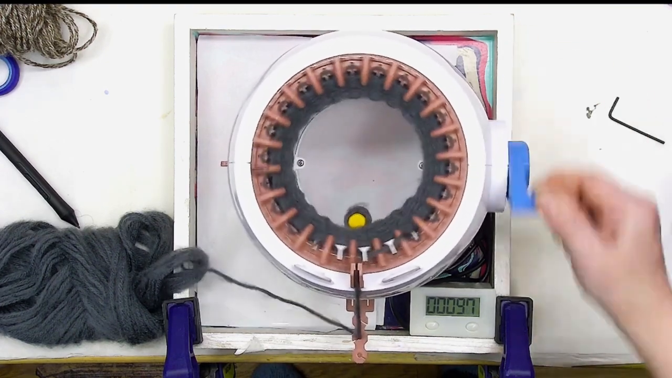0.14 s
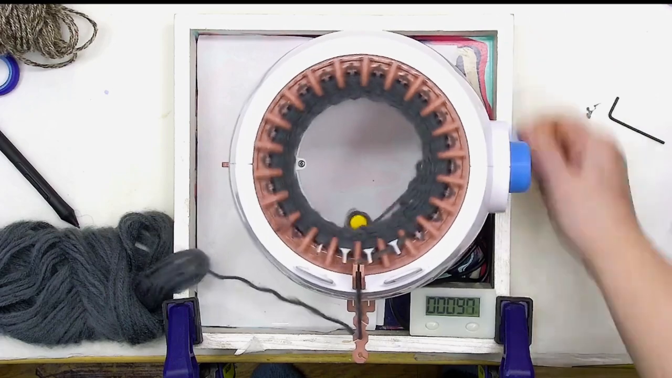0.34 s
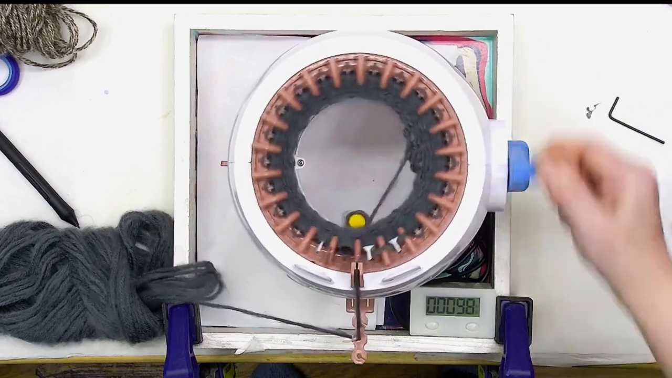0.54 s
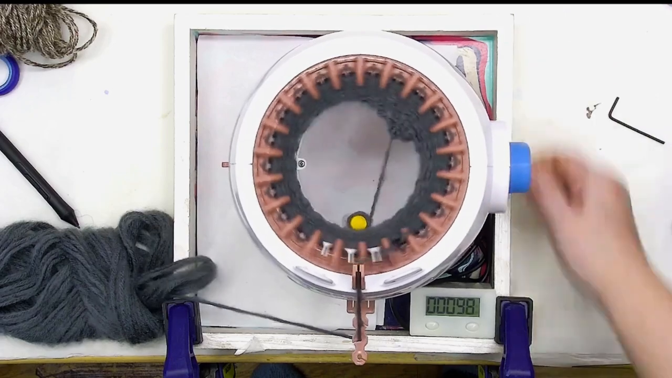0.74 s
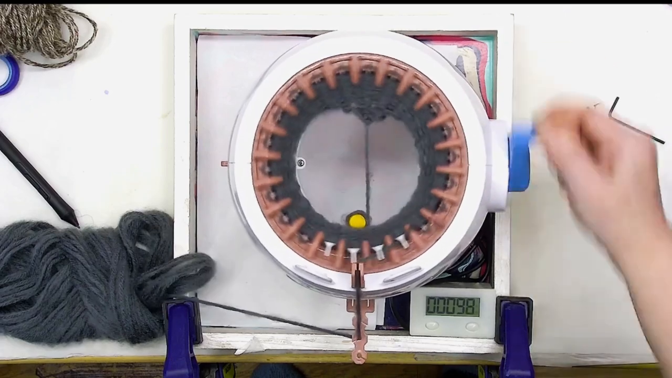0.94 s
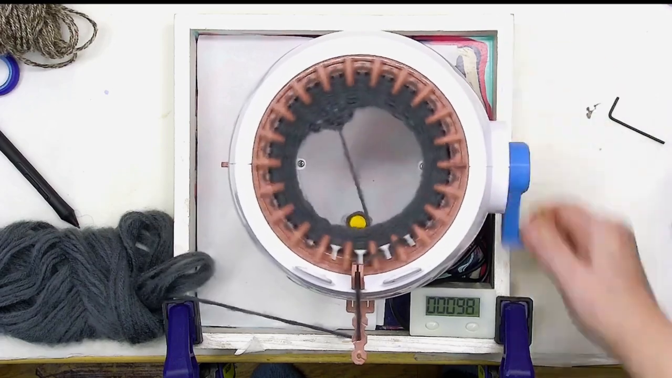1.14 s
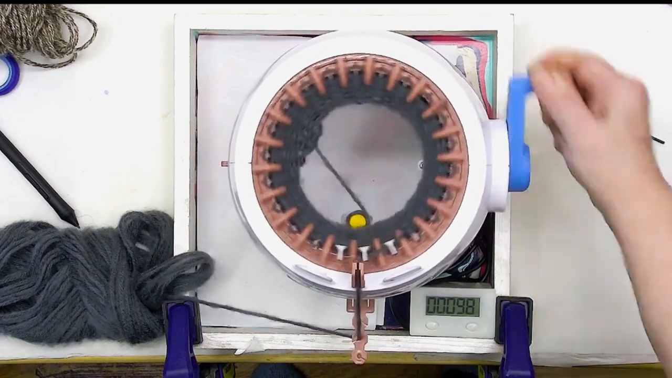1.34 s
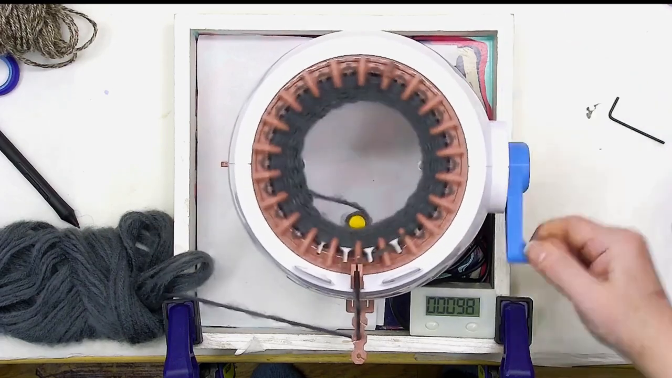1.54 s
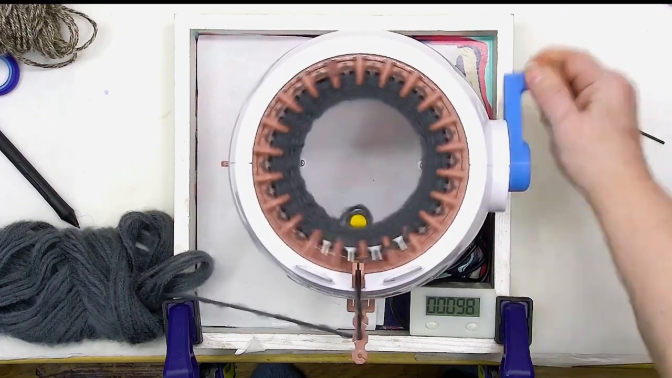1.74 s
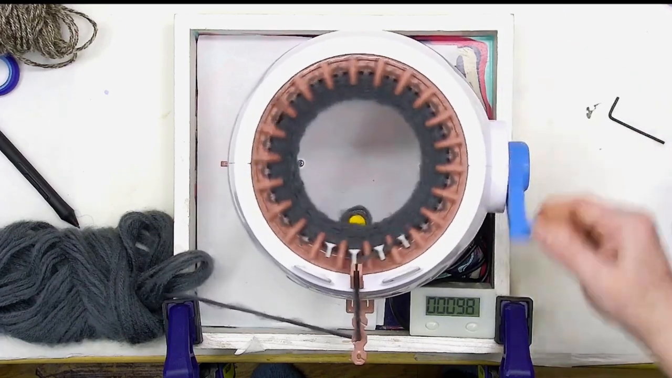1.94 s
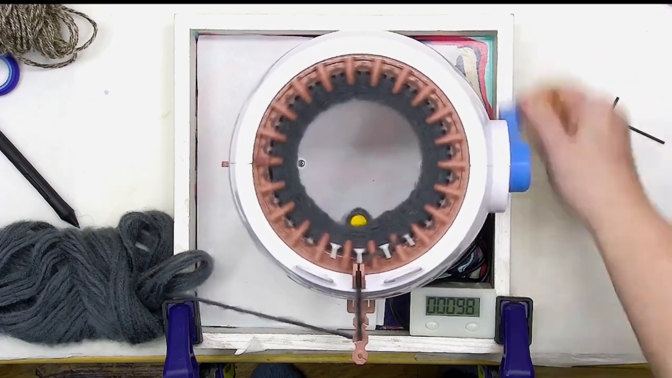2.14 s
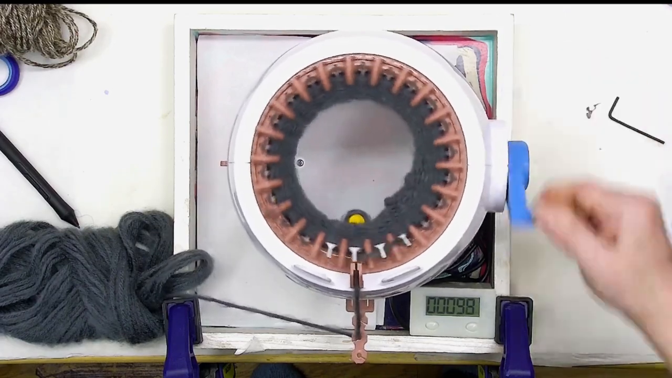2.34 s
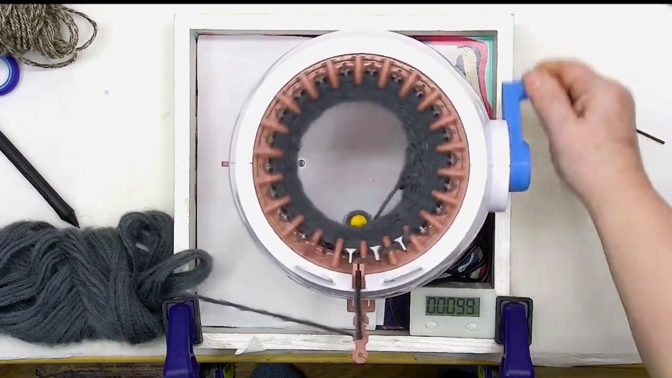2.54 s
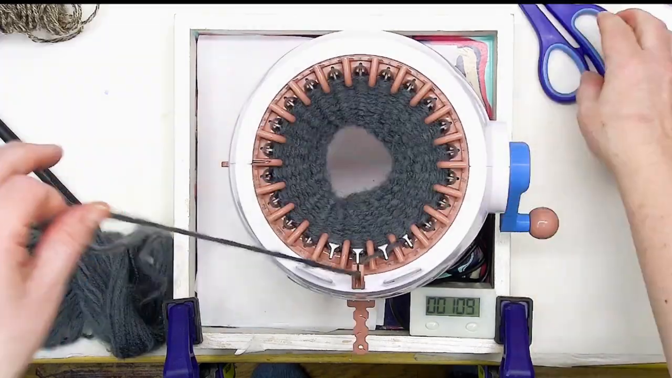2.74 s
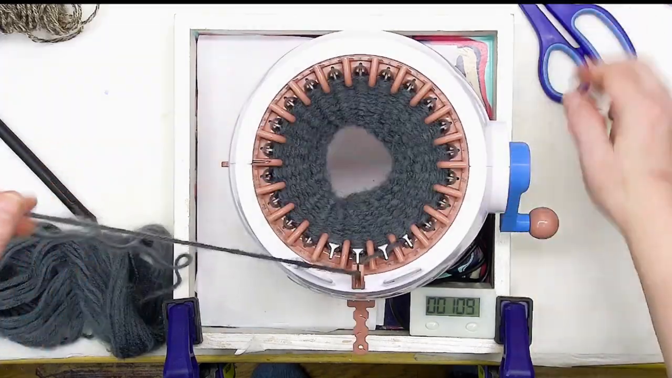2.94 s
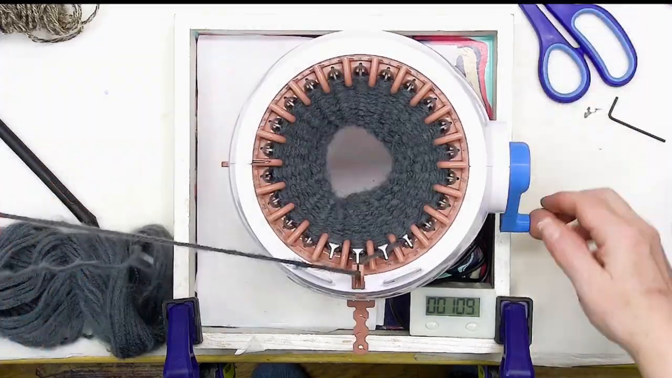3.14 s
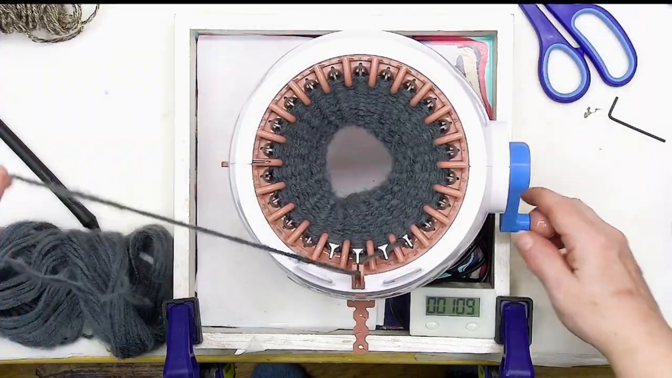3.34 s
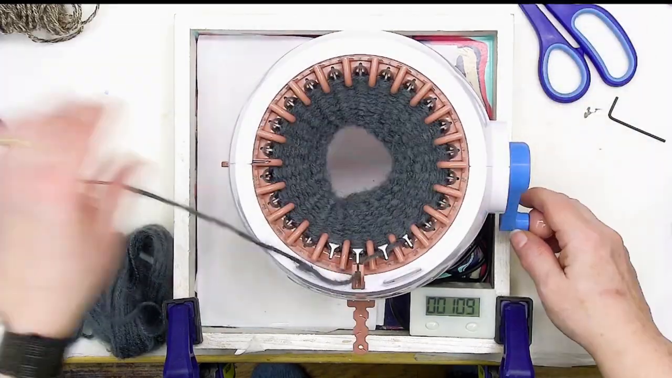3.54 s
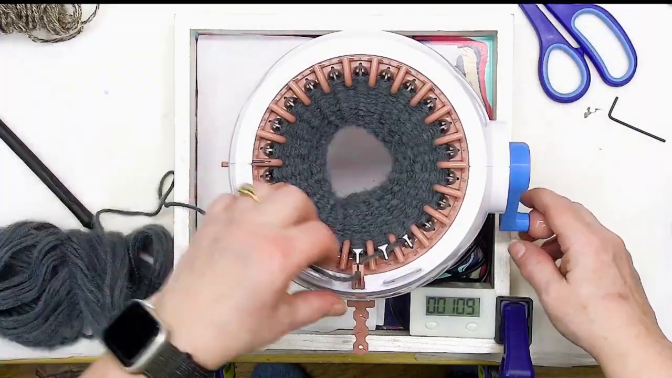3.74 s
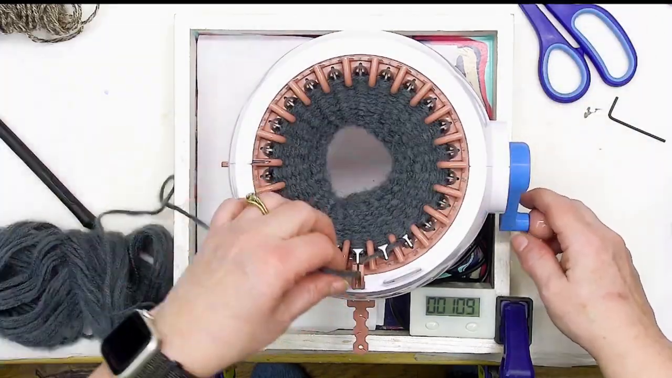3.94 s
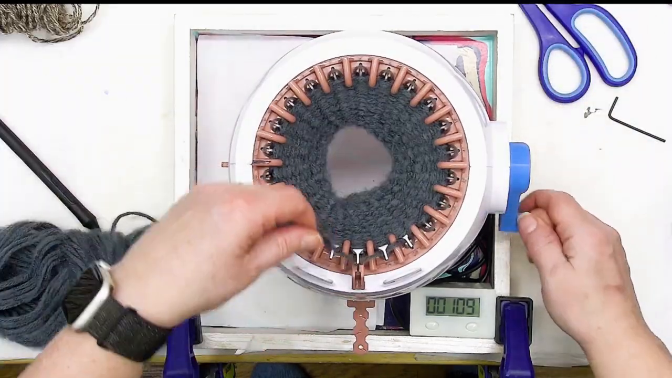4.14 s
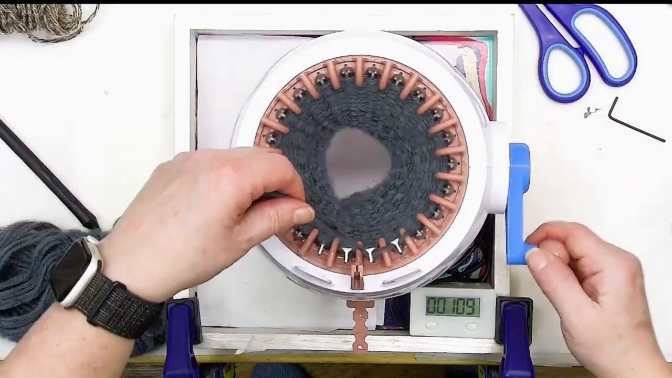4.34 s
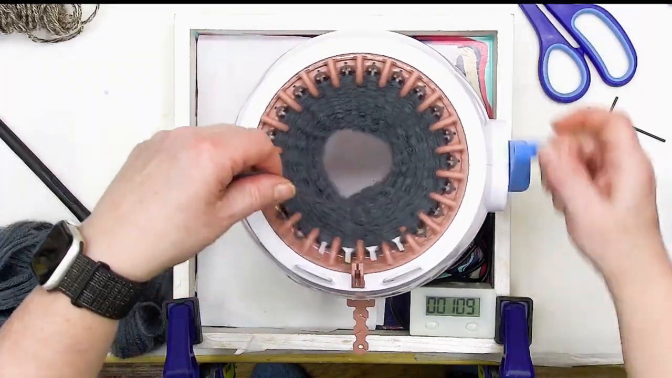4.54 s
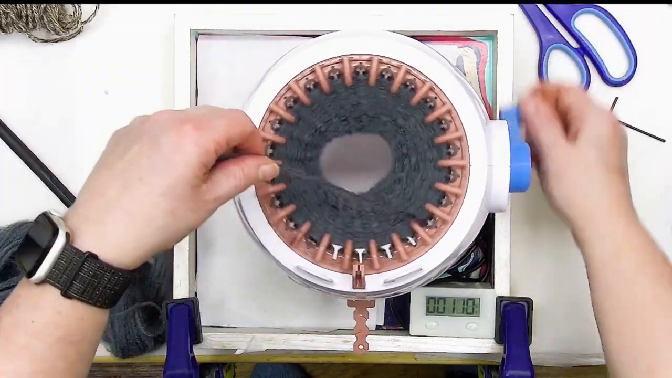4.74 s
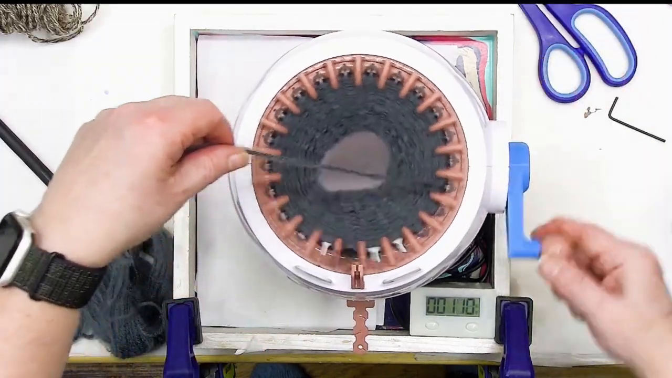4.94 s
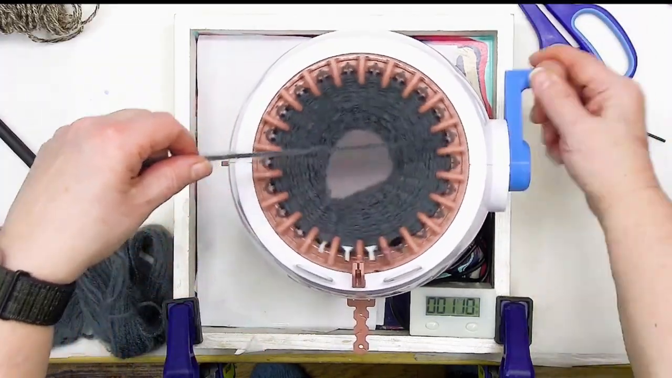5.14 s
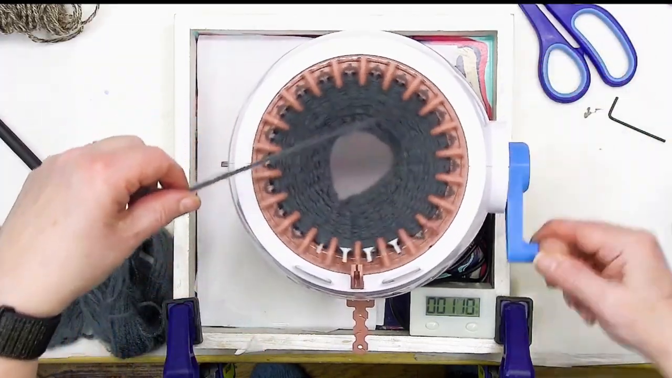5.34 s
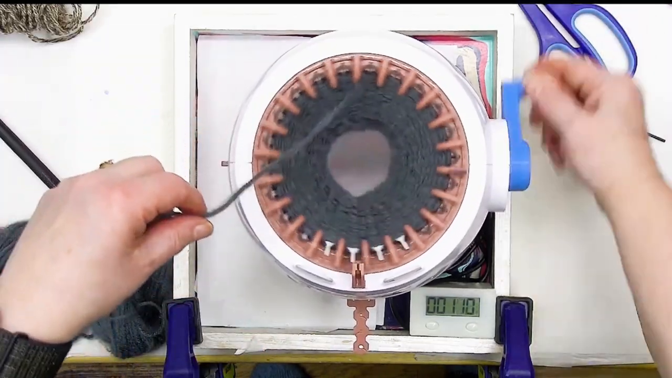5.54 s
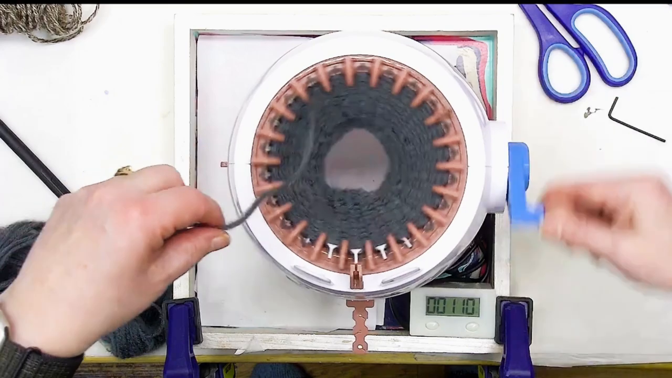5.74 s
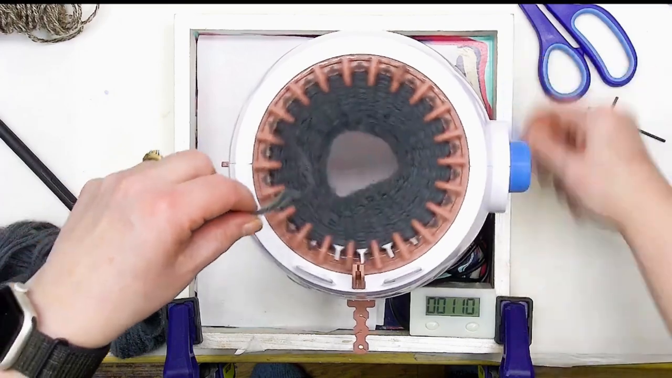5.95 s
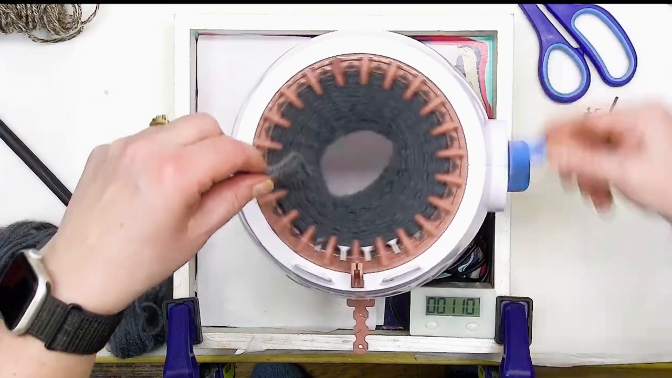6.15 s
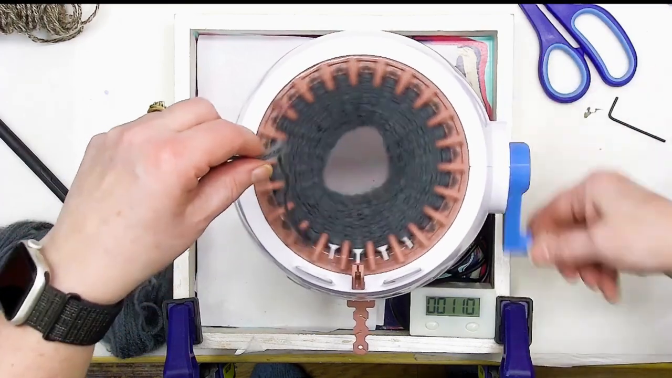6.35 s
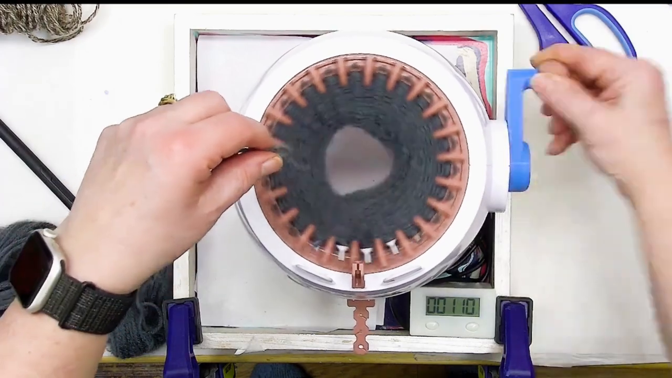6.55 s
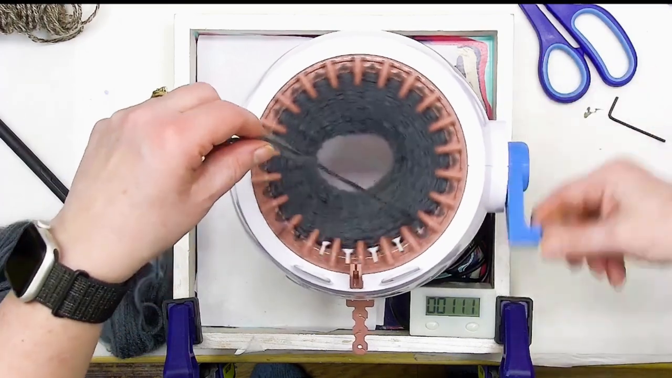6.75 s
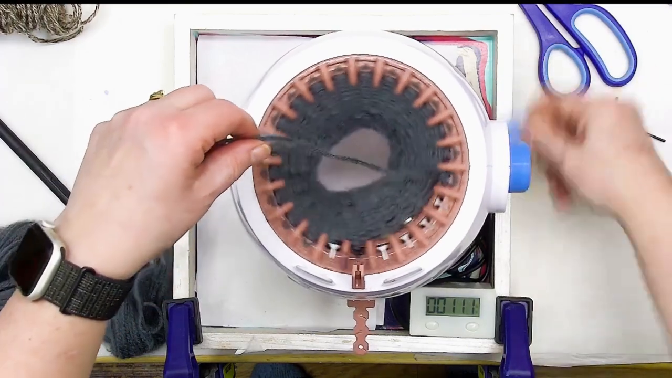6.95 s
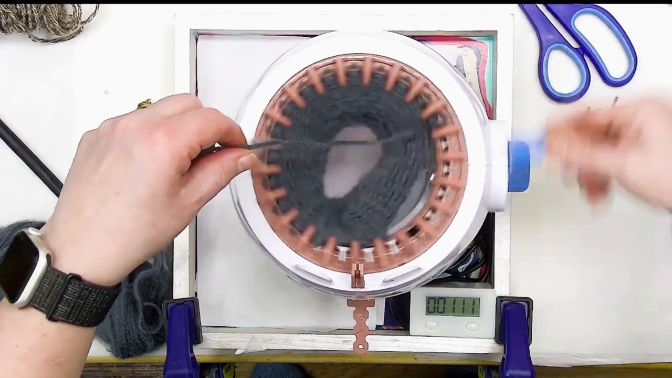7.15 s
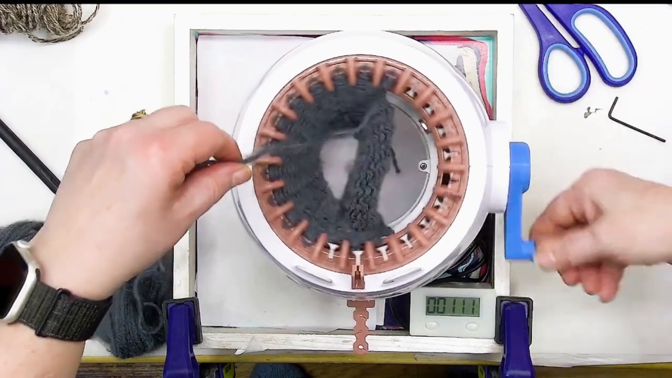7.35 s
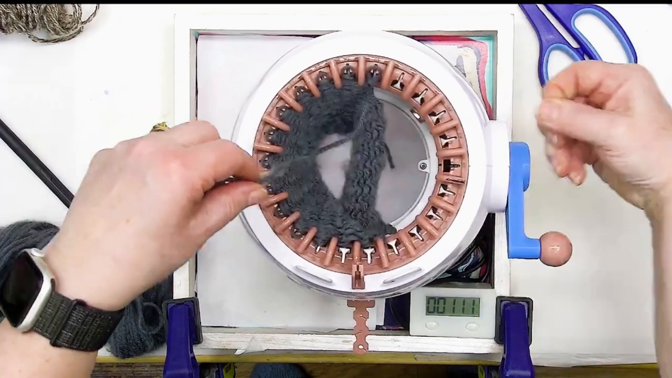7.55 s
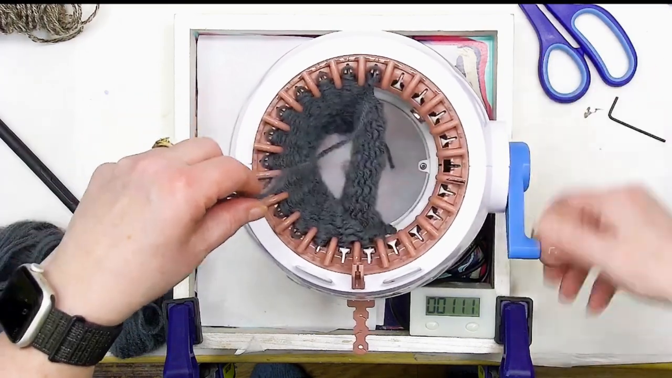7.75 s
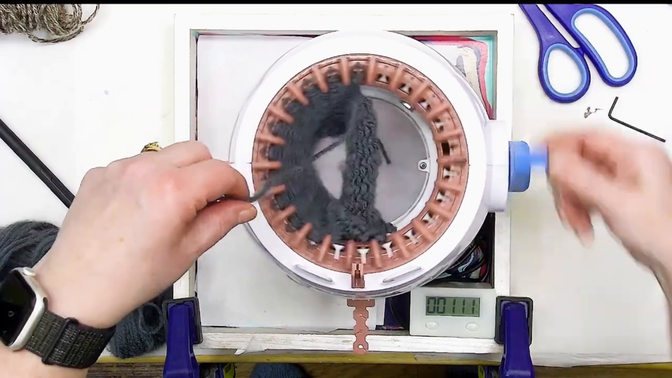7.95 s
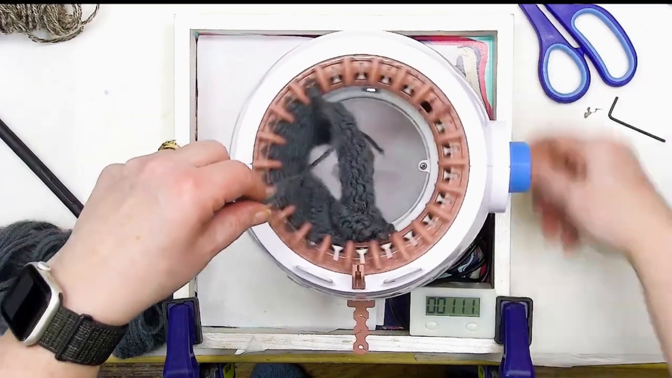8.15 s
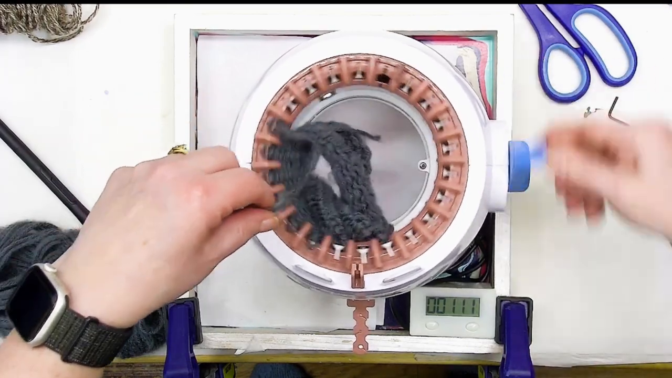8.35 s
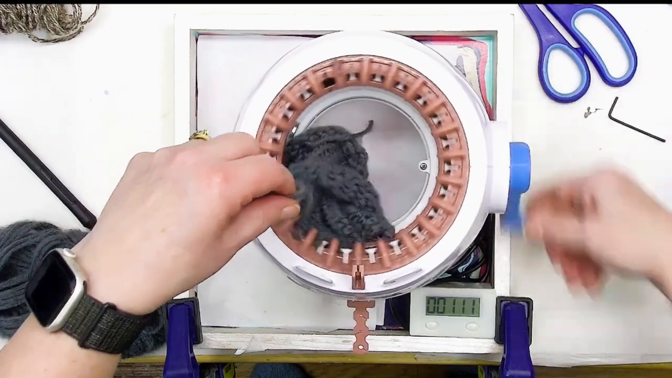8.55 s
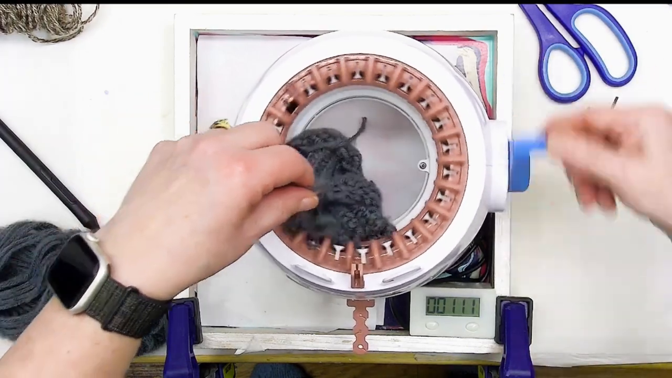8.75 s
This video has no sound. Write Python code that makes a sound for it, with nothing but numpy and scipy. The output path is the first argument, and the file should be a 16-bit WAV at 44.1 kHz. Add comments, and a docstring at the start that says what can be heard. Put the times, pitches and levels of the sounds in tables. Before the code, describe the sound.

Close up in a quiet room, a hollow plastic knitting machine is hand-cranked quickly: loud, even clacks with lighter clicks between them over a ticking, scraping hiss and low table rumble. It stops abruptly, leaving faint handling taps. Cranking returns softer and a little uneven, picks up speed, then thins into dry, ringing knocks with a short groan, and a brief pause before the last few clicks.

```python
"""Hand-cranked knitting machine

A plastic circular knitting machine clamped to a table is cranked by hand in a quiet room, with two pauses.
Each needle clacks over its cam as a burst of tiny impacts ringing in the hollow shell; between clacks the
needles slide as patchy, ticking hiss, and cranking shakes the table top with low noise and swelling tones.
In the pauses, hands brush the handle and the yarn as faint, short blows; short rubs and squeaks of
narrow-band noise come mostly during cranking."""
import sys
import numpy as np
from scipy import signal
from scipy.fft import rfft, irfft
from scipy.io import wavfile
from scipy.ndimage import uniform_filter1d

SR = 44100
rng = np.random.default_rng(int(sys.argv[2]) if len(sys.argv) > 2 else 0)


def file_out(sig):
    """Save sig as 16-bit WAV at sys.argv[1]."""
    # one column per channel
    cols = np.atleast_2d(sig).T
    # limit, then scale
    lim = np.clip(cols, -1, 1)
    pcm = np.round(lim * 32767).astype(np.int16)
    wavfile.write(sys.argv[1], SR, pcm)


N = 392049

# Modes of the hollow plastic shell. Each row: frequency in Hz, width in Hz, full height over the broad colour in dB.
SHELL_MODES = [(212, 10, 3), (354, 130, 11.5), (609, 164, 7.5), (728.6, 79, 6), (867.5, 50, 8),
               (1245, 32, 4.5), (1730, 340, -2), (2970, 60, 4), (7350, 250, 0.5), (8700, 500, 4),
               (12450, 1600, 6)]
# Colour of needles sliding along the cam track. Each row: frequency in Hz, relative level in dB per Hz.
SLIDE_COLOUR = [(71, -26), (120, -6.5), (167, -10), (372, -4.5), (486, -7.5), (718, -5), (796, -7),
                (2970, -10), (12300, -26.5), (16300, -42.5)]


def gain_of(db):
    """Decibels to amplitude."""
    return 10 ** (np.asarray(db) / 20)


def evened(x):
    """Scales to rms 1."""
    return x / np.sqrt(np.mean(x ** 2) + 1e-20)


def read(points, hz):
    """Reads a table of values against frequency on a log-frequency axis."""
    f, value = np.transpose(points)
    return np.interp(np.log(hz + 1), np.log(f + 1), value)


def add(mix, s, sound):
    """Lays a sound into the mix at s seconds."""
    part = mix[round(s * SR):][:len(sound)]
    part += sound[:len(part)]


def bump(hz, centre_hz, width_hz):
    """A resonance peak of height 1."""
    return 1 / (1 + (2 * (hz - centre_hz) / width_hz) ** 2)


def shell_db(hz, shares=1):
    """The modes of the hollow shell standing out of the broad colour, each scaled by its share."""
    shares = shares * np.ones(len(SHELL_MODES))
    return sum(share * db * bump(hz, f, w) for share, (f, w, db) in zip(shares, SHELL_MODES))


def causal(db, size=2048):
    """Impulse response that rings after the blow, never before it (folded cepstrum)."""
    floored_db = np.maximum(db, db.max() - 100)
    cepstrum = irfft(np.log(gain_of(floored_db)), size)
    cepstrum[1:size // 2] *= 2
    cepstrum[size // 2 + 1:] = 0
    return irfft(np.exp(rfft(cepstrum)), size)[:size // 2]


def noise(db, size=512):
    """Noise of rms 1 from random short-time spectra; db is bins x frames or bins x 1."""
    a, b = rng.standard_normal((N * 4 // size + 5, size // 2 + 1, 2)).T
    spectra = (a + 1j * b) * gain_of(db)
    return evened(signal.istft(spectra, nperseg=size, noverlap=size * 3 // 4)[1][:N])


def hush():
    """Steady room and microphone noise."""
    # Each row: frequency in Hz, relative level in dB per Hz.
    colour = [(59, -47), (100, -12.5), (141, -12), (178, -4.5), (215, -7), (367, -10.5), (408, -2.5),
              (575, -15.5), (6530, -35), (10700, -34), (16300, -62.5)]
    hz = np.fft.rfftfreq(2048, 1 / SR)
    return gain_of(-70.5) * noise(read(colour, hz)[:, None], size=2048)


def jiggle(count=8):
    """Idle needles tick in their slots, each group with its own pitch."""
    hz, out = np.fft.rfftfreq(2048, 1 / SR), np.zeros(N)
    for ring_hz in np.geomspace(900, 9000, count):
        size_db = 3.7 * np.minimum(rng.exponential(1, N), 4)
        loose = gain_of(size_db) * (rng.random(N) < 90 / SR)  # about 90 ticks a second in each group
        fading = np.exp(-np.arange(600) / SR / 0.0018)
        bounce = rng.standard_normal(N) * signal.oaconvolve(loose, fading)[:N]
        colour_db = read(SLIDE_COLOUR, hz) + shell_db(hz) + 11 * bump(hz, ring_hz, 0.46 * ring_hz)
        out += signal.oaconvolve(bounce, causal(colour_db))[:N]
    return evened(out)


def sliding():
    """Needles and ring scrape along the cam track: patchy hiss with small ticks, through the shell."""
    # Spells of cranking. Each row: time in seconds, level in dB, brightness in dB per two octaves.
    spells = [
        [(0.0, -44, 1.5), (0.4, -48.5, -1), (1.64, -46.5, 0.5), (2.51, -49, -2.5), (2.72, -49, -0.5)],
        [(4.2, -63.5, -8.5), (4.39, -56, -0.5), (4.95, -49.5, 1), (6.18, -47.5, 2.5), (7.34, -49.5, 3.5),
         (7.43, -53, 1), (7.56, -56, -5)],
        [(7.86, -56, -0.5), (8.002, -49.5, 2.5), (8.95, -51, 3)],
    ]
    hz, t = np.fft.rfftfreq(512, 1 / SR), np.arange(N) / SR
    frames = np.arange(N // 128 + 5) * 128 / SR
    s, level_db, bright_db = np.vstack(spells).T
    grain = rng.standard_normal((len(frames), 257)).T
    patches = evened(uniform_filter1d(uniform_filter1d(grain, 8, 0), 8, 1))
    flicker = evened(uniform_filter1d(rng.standard_normal(len(frames)), 4))
    tilt_db = np.log2(hz[:, None] / 2000 + 0.04) * np.interp(frames, s, bright_db) / 2
    colour_db = (read(SLIDE_COLOUR, hz) + 0.13 * shell_db(hz))[:, None]
    hiss = noise(colour_db + tilt_db + 2.9 * patches + 2.26 * flicker)
    hiss = evened(hiss + gain_of(-2.0) * jiggle())
    moving = np.zeros(N)  # silent in the pauses
    for spell in spells:
        start, end = spell[0][0], spell[-1][0]
        moving += np.interp(t, [start - .01, start, end - .04, end], [0, 1, 1, 0])
    return hiss * moving * gain_of(np.interp(t, s, level_db))


def shaking():
    """The table top sways loosely, and each push on the handle swells its main mode."""
    # Table top colour. Each row: frequency in Hz, relative level in dB per Hz.
    table_top = [(8, -26.5), (16, -1.5), (27, 3.5), (39, -5.5), (56, -2.5), (72, -10.5), (92, -9.5),
                 (115, -25.5), (135, -19), (165, -38), (260, -60)]
    # Loose swaying. Each row: time in seconds, level in dB.
    sways = [(0.0, -45.5), (2.52, -48.5), (2.87, -58.5), (4.05, -60.5), (4.63, -48), (5.5, -46.5),
             (7.4, -50), (7.8, -55.5), (8.0, -50.5), (8.89, -52.5)]
    # Pushes on the handle. Each row: time of the peak in seconds, rms level at the peak in dB.
    thuds = [(.05, -43), (.5, -47), (.83, -44.5), (1.2, -45.5), (1.53, -44.5), (1.88, -44.5), (2.25, -48),
             (2.46, -45), (2.64, -50), (4.41, -50), (4.85, -53.5), (4.98, -47.5), (5.368, -43),
             (5.75, -44.5), (6.02, -48), (6.45, -54), (6.75, -51.5), (7.15, -58), (7.48, -57), (8.22, -54),
             (8.6, -57)]
    hz, t = np.fft.rfftfreq(8192, 1 / SR), np.arange(N) / SR
    s, sway_db = np.transpose(sways)
    out = noise(read(table_top, hz)[:, None], size=8192) * gain_of(np.interp(t, s, sway_db))
    for peak_s, db in thuds:
        swell = gain_of(db) * np.exp(-((t - peak_s) / 0.054) ** 2)
        thud_hz = 56.8 * rng.uniform(.94, 1.3)
        out += np.sqrt(2) * swell * np.sin(2 * np.pi * (thud_hz * t + rng.random()))
    return out


def blow(blow_db, boom_db, tick_db, ring_hz, chatter_ms, width_hz=650, size=2048):
    """A quick chatter of tiny impacts, then a weaker rebound, coloured by shell, body and needle."""
    # Broad colour of the machine. Each row: frequency in Hz, relative level in dB per Hz.
    broad = [(71, -50), (120, 1.5), (163, -11), (213, 0.5), (364, -7), (486, -2), (635, 0), (1600, -7),
             (1890, -3.5), (3720, -9), (8460, -15.5), (12500, -30), (16300, -34.5)]
    hz, ms = np.fft.rfftfreq(size, 1 / SR), np.arange(size * 2) / SR * 1000
    ring_db = np.clip(6.5 - 0.22 * (boom_db + tick_db), 0, 13)  # the less boom and tick, the cleaner the knock
    shares = 1 + 0.52 * rng.uniform(-1.1, 1, len(SHELL_MODES))  # each needle strikes the shell at another place
    colour = gain_of(read(broad, hz) + shell_db(hz, shares) + ring_db * bump(hz, ring_hz, width_hz))

    # boom below about 1 kHz and tick above about 4.5 kHz, weighed against the middle
    low, high = 1 / (1 + (hz / 1000) ** 6), 1 / (1 + (4500 / (hz + 1)) ** 6)
    power = np.zeros(len(hz))
    for share, db in [(low, boom_db), (1 - low - high, 0), (high, tick_db)]:
        band = share * colour ** 2
        power += band / np.mean(band) * gain_of(db) ** 2
    body = causal(10 * np.log10(power + 1e-12))

    first = 0.53 * max(ring_db - 6, 0) * np.exp(-ms / 0.72)  # a clean knock puts its weight into the first blow
    lasting = (1 - 0.5 * np.exp(-ms / 2.6)) * np.exp(-(ms / chatter_ms) ** 1.62)
    chatter = np.minimum(ms / 1.22, 1) * (lasting + first)
    late, size_db = rng.uniform(1.53, 2.2), rng.uniform(-18.5, -14.5)  # no two rebounds are alike
    rebound = gain_of(size_db) * np.exp(-((ms - late * chatter_ms) / (1.65 * chatter_ms)) ** 2)
    shape = chatter + rebound

    uneven_db = 0.91 * np.repeat(rng.standard_normal(len(ms) // 16), 16)
    impacts = rng.standard_normal(len(ms)) * gain_of(uneven_db)
    sound = signal.fftconvolve(impacts * shape, body)
    # the same energy whatever the random impacts
    sound *= np.linalg.norm(shape) * np.linalg.norm(body) / np.linalg.norm(sound) / shape.max()
    return gain_of(blow_db) * sound


def softer_boom_db(blow_db):
    """Softer blows leave more of their weight in the shell."""
    return -0.3 * (blow_db + 36.5)


def clacks():
    """A needle drops over the cam; slower cranking draws its chatter out."""
    # Each row: time in seconds, blow level in dB, needle tick in dB against the middle of the blow.
    rows = [(0.0418, -31, -10.5), (0.1518, -34.5, -1.5), (.237, -29, -8.5), (.337, -34.5, -6.5),
            (.428, -29, -7), (0.5235, -30.5, -7), (0.612, -29, -6), (0.711, -27.5, -7), (0.7924, -35, -4.5),
            (.894, -37.5, -2.5), (0.9871, -32.5, -1), (1.0751, -37, -3.5), (1.1666, -32.5, -5),
            (1.2564, -35.5, -6.5), (1.3403, -39.5, -8), (1.4362, -33, -.5), (1.5246, -29.5, -4.5),
            (1.6212, -39, -1), (1.7113, -33, -3), (1.801, -33, -0.5), (1.8947, -35, -1),
            (1.9916, -38.5, -3.5), (2.0759, -39, -2.5), (2.1733, -42, -4.5), (2.2718, -37, -8.5),
            (2.399, -34.5, -3), (2.502, -35, -5), (2.591, -45.5, -2), (2.6421, -27.5, -7),
            (4.2041, -44, -4.5), (4.2866, -48.5, -5.5), (4.368, -39.5, -5.5), (4.5397, -44.5, -3),
            (4.6736, -41.5, -5.5), (4.808, -39, -12), (4.9343, -37.5, -8), (5.0471, -39.5, -6),
            (5.146, -38.5, -4.5), (5.252, -46, -2), (5.353, -39.5, -4), (5.451, -36.5, -3.5),
            (5.5302, -40.5, -1.5), (5.6241, -42.5, 1.5), (5.7137, -38.5, -4), (5.8131, -37, -3.5),
            (5.8965, -35, -10), (5.9849, -36, -7.5), (6.0702, -38, -4), (6.158, -37, -5.5),
            (6.235, -35.5, -6), (6.3251, -36, -6.5), (6.417, -44, -7), (6.537, -48.5, -6),
            (7.126, -50.5, -5), (8.6878, -45, -2.5), (8.7948, -45.5, 3.5)]
    out, times = np.zeros(N), np.transpose(rows)[0]
    gaps = np.diff(times, prepend=times[0] - np.median(np.diff(times)))
    gaps = np.minimum(gaps, 0.1)  # seconds
    for (s, blow_db, tick_db), gap in zip(rows, gaps):
        ring_hz = 1220 * 2 ** (.25 * rng.uniform(-1, 1))
        # later on, the longer tube of knitting drags on the needles and draws the chatter out
        chatter_ms = 2.9 + 73.8 * gap + 3.8 * (s > 3.5)
        add(out, s - .001, blow(blow_db, softer_boom_db(blow_db), tick_db, ring_hz, chatter_ms))
    return out


def catches():
    """The following needle catches, lighter and higher, between two clacks."""
    # Each row: time in seconds, blow level in dB.
    rows = [(.1034, -45), (.1996, -43), (.383, -45), (0.4763, -43), (0.4874, -40), (0.5674, -36.5),
            (0.658, -39.5), (0.7581, -35.5), (.856, -38), (0.9445, -35), (1.029, -35.5), (1.2983, -44.5),
            (1.474, -39.5), (1.5687, -44), (1.5917, -41.5), (1.6686, -38), (1.7683, -46), (1.8565, -44),
            (1.958, -44.5), (2.0402, -41.5), (2.1253, -39), (2.2162, -45.5), (2.44, -41), (2.568, -45),
            (4.593, -56), (4.8683, -50.5), (5.007, -47.5), (5.106, -46), (5.3105, -46), (5.409, -43),
            (5.4957, -40.5), (5.59, -49), (5.68, -45.5), (5.774, -50), (5.861, -50), (5.9454, -51),
            (6.029, -47), (6.206, -48), (6.29, -46), (6.37, -49), (6.4594, -47), (6.497, -47.5),
            (7.366, -66), (8.061, -64), (8.141, -52.5), (8.739, -49.5), (8.8713, -55)]
    out = np.zeros(N)
    for s, blow_db in rows:
        ring_hz = 2200 * 2 ** (.6 * rng.uniform(-1, 1))
        boom_db = softer_boom_db(blow_db) - 3.5
        add(out, s - .001, blow(blow_db, boom_db, tick_db=-3, ring_hz=ring_hz, chatter_ms=10.9))
    return out


def tail(x, count=4):
    """Sparse reflections of random sign in tray and room, each band dying at its own speed."""
    # Each row: frequency in Hz, time to fall by 60 dB in seconds.
    dying_s = [(200, 0.35), (600, 0.019), (1500, 0.14), (4000, 0.15), (10000, 0.12)]
    out, cycle = np.zeros(N), np.arange(N) / SR * 2.7
    for k in range(count):
        taps = np.zeros(SR // 2)
        at = np.arange(300, len(taps) - 20, 20)
        taps[at + rng.integers(0, 20, len(at))] = rng.choice([-1., 1.], len(at))
        hz, t, z = signal.stft(taps, SR, nperseg=256)
        fall_db = -60 * t / read(dying_s, hz)[:, None]
        dying = signal.istft(z * gain_of(fall_db), SR, nperseg=256)[1]
        # several random tails fade into one another, so the reverberation has no fixed colour
        fade = np.maximum(np.cos(2 * np.pi * (cycle - k / count)), 0)
        out += signal.fftconvolve(x * fade, dying / np.linalg.norm(dying))[:N]
    return out


def touches():
    """Hands touch the handle and the yarn guide: faint blows with a broad ring."""
    # Each row: time in seconds, blow level in dB, tick in dB against the middle of the blow, ring in Hz,
    # length in ms.
    rows = [(2.766, -67, -8, 1190, 6.6), (3.08, -65.5, -21, 1470, 7.3), (3.1077, -52, -16, 2580, 14),
            (3.241, -64, -30, 1810, 18), (3.272, -72, -25, 2000, 18), (3.3927, -54, -0.5, 2670, 11.5),
            (3.732, -59, -4.5, 2880, 28), (3.7707, -55, -7, 2200, 10), (3.818, -63.5, -16, 1210, 22),
            (3.875, -73.5, -9, 2600, 33), (4.0198, -65, -17, 2000, 16), (4.136, -71.5, -3.5, 1630, 16),
            (4.167, -69, -24, 1800, 20), (7.601, -55, -17, 2430, 11)]
    out = np.zeros(N)
    for s, blow_db, tick_db, ring_hz, length_ms in rows:
        add(out, s - .001, blow(blow_db, -4.5, tick_db, ring_hz, length_ms, width_hz=1800))
    return out


def rubs_and_squeaks():
    """Short narrow-band noises: rubs, high needle squeaks and pings, a low groan, a dull thump."""
    # Each row: start in seconds, length in seconds, centre in Hz, width in Hz, rms level before fading in dB.
    rows = [(2.78, 0.21, 2220, 400, -78.5), (4.271, 0.033, 1200, 250, -51), (4.489, 0.048, 1180, 150, -52),
            (4.828, 0.0048, 8550, 1100, -41), (4.848, .008, 8560, 1100, -49),
            (4.866, 0.0064, 8700, 1100, -41.5), (4.975, .007, 8600, 1100, -52),
            (6.689, 0.098, 712, 70, -44.5), (8.687, 0.028, 405, 120, -45.5),
            (8.794, 0.0077, 8000, 1600, -31.5)]
    out = np.zeros(N)
    for s, length, hz, width_hz, db in rows:
        edges_hz = [hz - width_hz / 2, hz + width_hz / 2]
        band = signal.butter(2, edges_hz, "bandpass", fs=SR, output="sos")
        settled = signal.sosfilt(band, rng.standard_normal(SR // 2))[-round(length * SR):]
        tone = evened(settled)
        fade = signal.windows.tukey(len(tone), .12) * np.linspace(1, .2, len(tone))
        add(out, s, gain_of(db) * tone * fade)
    return out


def knocks():
    """Dry knocks of needles that carry no stitch: little boom, a clear ring."""
    # Each row: time in seconds, blow level in dB, needle tick in dB against the middle of the blow, ring in Hz.
    rows = [(4.485, -47, -8, 1150), (5.0733, -39.5, -20, 1450), (6.1283, -40, -19, 1040),
            (6.6462, -41, -8, 2820), (6.6802, -45.5, -6, 1880), (6.7417, -43, -24, 2460),
            (6.9134, -42.5, -8, 2120), (6.9734, -33.5, -14, 1440), (7.0369, -42, -11, 2200),
            (7.1485, -40.5, -6, 2480), (7.2974, -32.5, -14.5, 1320), (7.4717, -42, 1, 2200),
            (7.483, -38, -5.5, 2690), (7.7493, -35, -15.5, 1890), (7.847, -38, -19, 1330),
            (7.8822, -43.5, -2, 3150), (7.9858, -45.5, 0.5, 1390), (8.0235, -40.5, -3, 2600),
            (8.2888, -45, -32, 2060), (8.4485, -41.5, -22, 2050), (8.55, -42.5, -10, 2070),
            (8.67, -41, -15, 2100), (8.826, -38.5, -28, 1320)]
    out = np.zeros(N)
    for s, blow_db, tick_db, ring_hz in rows:
        add(out, s - .001, blow(blow_db, -11.5, tick_db, ring_hz, chatter_ms=10))
    return out


def scene():
    """The machine, its tail, the table and the room."""
    machine = clacks() + catches() + touches() + rubs_and_squeaks() + knocks()
    reflected = gain_of(-12.5) * tail(machine)
    return (machine + reflected + sliding() + shaking() + hush())[None]


def record(dry):
    """A steep low-pass at 15.9 kHz: no treble above it."""
    low_pass = signal.firwin(511, 15900, window=("kaiser", 9), fs=SR)
    return signal.oaconvolve(dry, low_pass[None], "same")


dry = scene()
out = record(dry)
file_out(out)
```